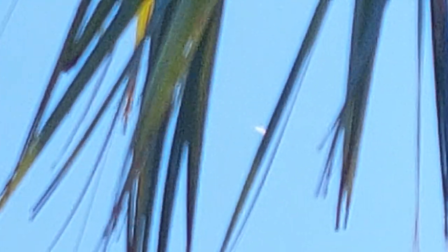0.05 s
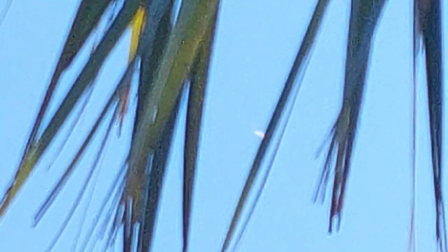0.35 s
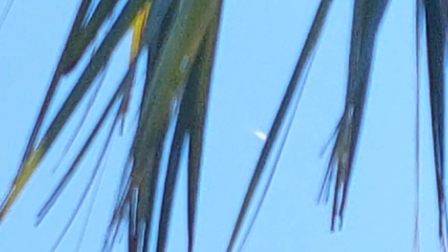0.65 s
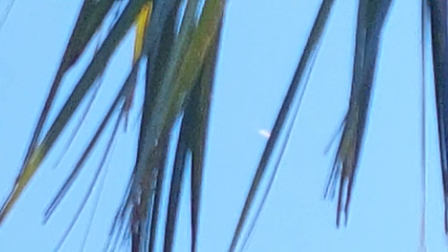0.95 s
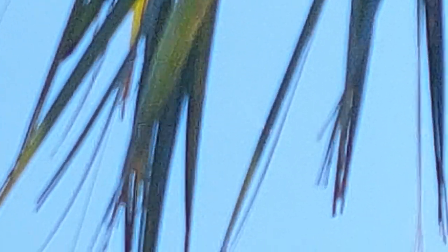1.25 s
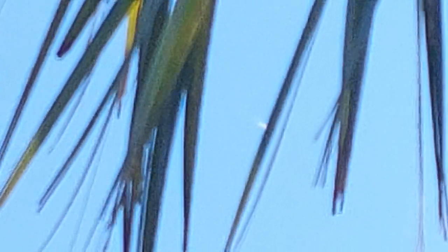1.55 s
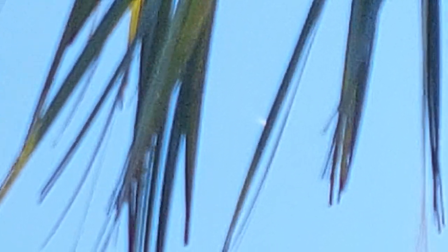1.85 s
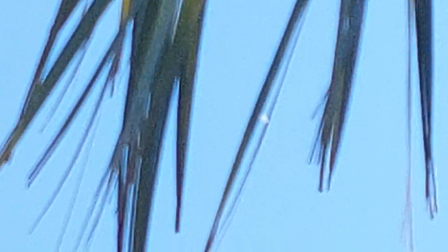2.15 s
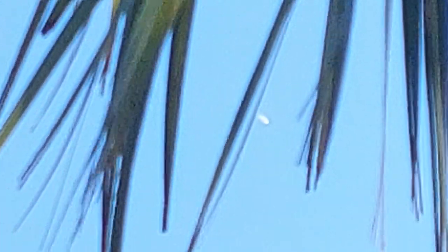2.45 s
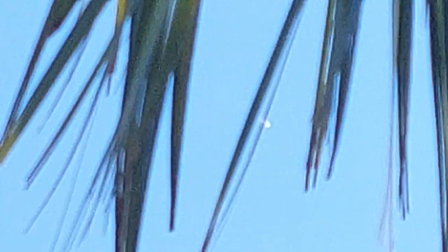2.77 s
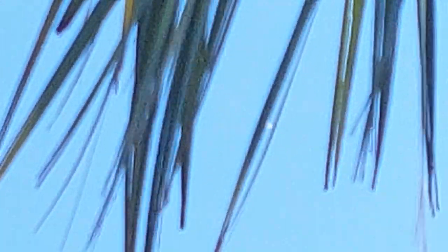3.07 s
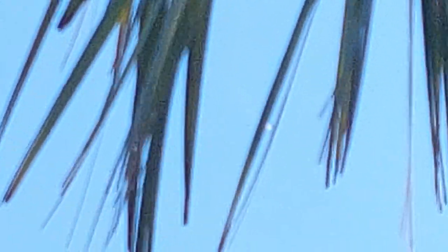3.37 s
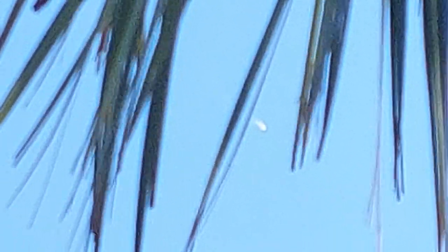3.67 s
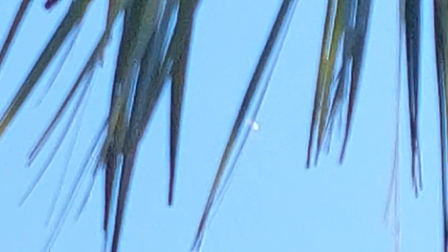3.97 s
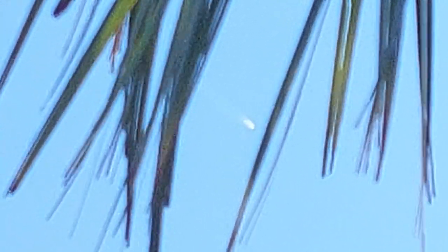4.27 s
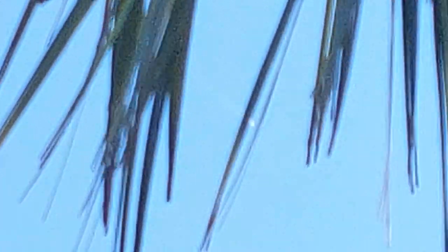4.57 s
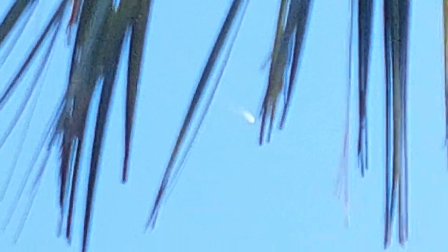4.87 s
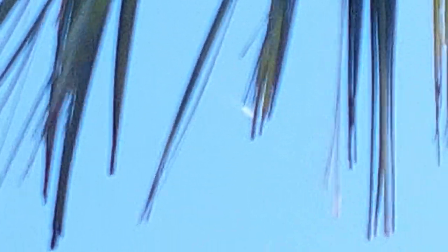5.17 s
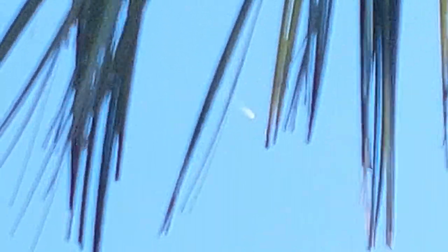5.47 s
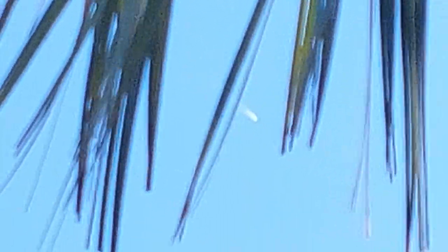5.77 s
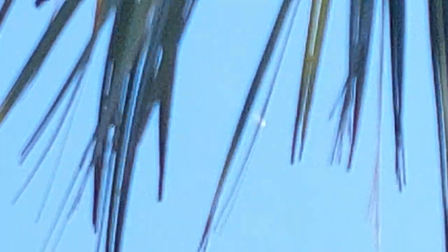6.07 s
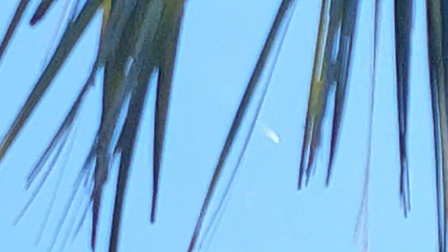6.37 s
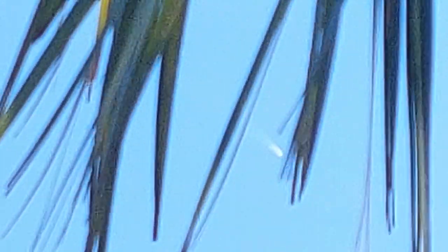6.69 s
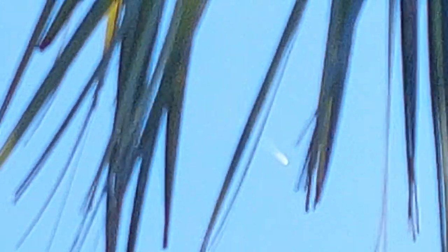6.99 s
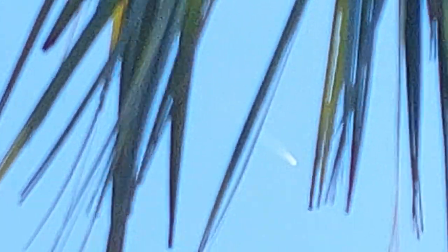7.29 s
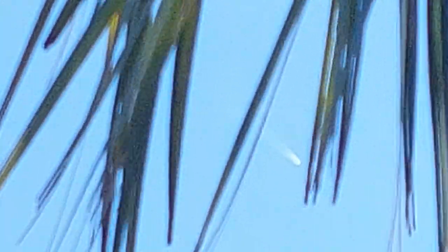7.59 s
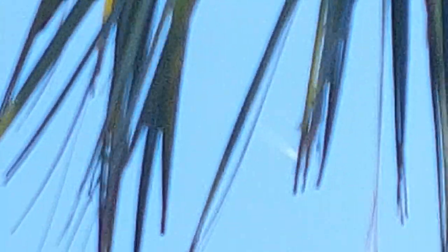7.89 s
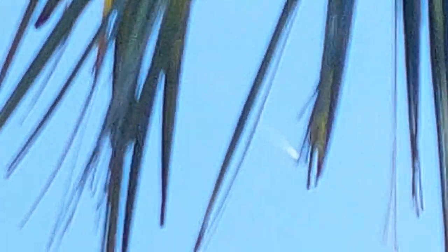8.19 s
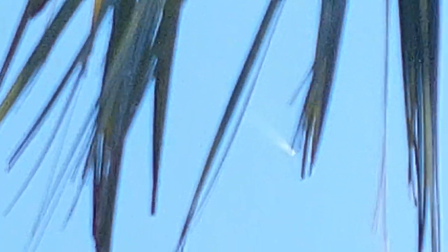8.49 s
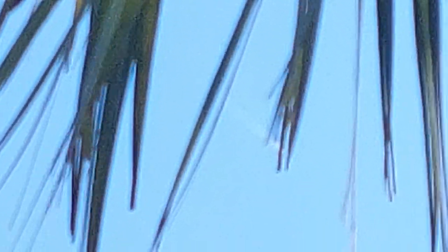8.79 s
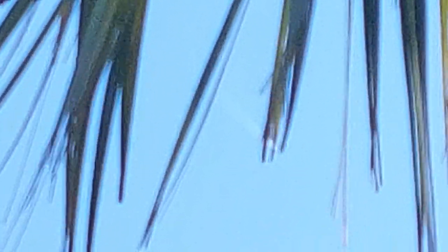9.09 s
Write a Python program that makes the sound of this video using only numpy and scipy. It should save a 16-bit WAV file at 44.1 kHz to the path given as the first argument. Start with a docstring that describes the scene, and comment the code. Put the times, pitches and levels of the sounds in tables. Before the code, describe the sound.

A far rocket rumbles outdoors as a throbbing helicopter approaches, passes and recedes, with palm leaves faintly hissing and crackling.

```python
"""From the start a far rocket's exhaust rumbles, a rotor, likely a helicopter's, beats as it approaches,
and a breeze hisses and swishes in a palm overhead. Near 3 s come a brief growl and the first frond crackle.
The rotor passes at 3.9 s: its drone, slap and rasp sink by the Doppler effect over a throbbing rush of air.
Around 5 s something loose, heard only now and then before, ticks in time with the blades. The wake swells
at 5.6 s, and from 6.7 s a faint, thin turbine whine comes and goes."""
import sys
import numpy as np
from scipy import signal
from scipy.fft import rfft, irfft, next_fast_len
from scipy.io import wavfile

SR = 44100
rng = np.random.default_rng(int(sys.argv[2]) if len(sys.argv) > 2 else 0)


def inscribe(sig):
    """Save sig as 16-bit PCM at rate SR to the path in sys.argv[1].

    A 1-D sig is mono; a 2-D sig holds one channel per row.
    Samples are clipped to [-1, 1] before scaling.
    """
    pcm = np.round(np.clip(np.atleast_2d(sig).T, -1, 1) * 32767)
    wavfile.write(sys.argv[1], SR, pcm.astype(np.int16))


N = 403074
T = np.arange(N) / SR


def amp(db):
    """The decibel scale: 20 dB is a factor of ten in amplitude."""
    return 10 ** (np.asarray(db) / 20)


def bell(x):
    """Gaussian curve, 1 at x = 0 and 1/e at x = 1."""
    return np.exp(-x ** 2)


def curves(rows):
    """Linear interpolation in time: each column after t as a value per sample."""
    times, *columns = np.transpose(rows)
    return [np.interp(T, times, column) for column in columns]


def spectrum_at(points, hz):
    """Interpolation of a spectrum on a log-frequency axis."""
    f, value = np.transpose(points)
    return np.interp(np.log(hz + 1), np.log(f + 1), value)


def drift(rate_hz, size=2048):
    """Low-pass noise: a random fluctuation of rms 1, up to about this rate."""
    f = np.fft.rfftfreq(size, N / SR / size)
    slow = irfft(rfft(rng.standard_normal(size)) * bell(f / rate_hz))
    return np.interp(T, np.linspace(0, N / SR, size), slow / np.sqrt(np.mean(slow ** 2)))


# Coherence of the two microphone ports: f/Hz, coherence
COHERENCE = [(60, .97), (130, .95), (290, .85), (600, .5), (1400, .5), (4000, .46), (15000, .46)]
# Left port relative to right: f/Hz, level/dB
BALANCE = [(60, -.4), (1200, 0), (2400, 3.5), (4400, 4.5), (8100, 6), (12000, 4), (15000, 3)]
def noise(spectrum, grain_db=0, lead_s=0, count=N, tint=lambda hz: 0):
    """Partially coherent noise at two ports, their mean at rms 1; random grain makes it crinkle."""
    size = next_fast_len(count, True)
    hz = np.fft.rfftfreq(size, 1 / SR)
    grains = amp(grain_db * np.minimum(rng.exponential(1, size), 6))
    left, independent = rfft(rng.standard_normal((2, size)) * grains)
    coherence = spectrum_at(COHERENCE, hz)
    delayed = np.exp(-2j * np.pi * hz * lead_s) * left
    right = coherence * delayed + np.sqrt(1 - coherence ** 2) * independent
    balance_db = np.array([[.5], [-.5]]) * spectrum_at(BALANCE, hz)
    colour = amp(spectrum_at(spectrum, hz) + tint(hz) + balance_db)
    ports = irfft(np.array([left, right]) * colour, size)[:, :count]
    return ports / np.sqrt(np.mean(ports.mean(0) ** 2))


# Exhaust envelopes: t/s, rumble level/dB, roar level/dB
ROCKET_LEVELS = [(0, -26, -40.5), (1.2, -26, -38), (1.7, -28.5, -39), (2.6, -31.5, -28.5),
                 (3.3, -39, -28.5), (5.8, -40, -30.5), (7.0, -33, -31), (7.8, -32, -28.5), (9.14, -32, -30)]
# Exhaust spectra: f/Hz, relative level/dB
RUMBLE_SPECTRUM = [(8, -47), (25, -18.5), (33, -3), (45, -1), (60, 9), (85, 3), (130, -5), (200, -14),
                   (330, -50), (800, -71.5), (2000, -140)]
ROAR_SPECTRUM = [(40, -31), (85, 6), (130, 2.5), (170, -8.5), (250, -4.5), (310, -12.5), (400, -16.5),
                 (500, -29), (900, -46.5), (2500, -120)]
def rocket(rumble_lift_db=2, lumps_db=1.5):
    """Jet noise, its treble lost to air absorption: a lumpy rumble under a smoother roar."""
    rumble_db, roar_db = curves(ROCKET_LEVELS)
    rumble = noise(RUMBLE_SPECTRUM) * amp(rumble_db + rumble_lift_db + lumps_db * drift(8.8))
    return rumble + noise(ROAR_SPECTRUM) * amp(roar_db)


BLADE_HZ, SPEED_M_PER_S, SOUND_M_PER_S = 22.347, 23.8, 343
def flight(closest_m=27.6, closest_s=3.91):
    """Spherical spreading from a straight path: nearness (1 at most), heading (+ coming, - going)."""
    along_m = SPEED_M_PER_S * (closest_s - T)
    distance_m = np.hypot(along_m, closest_m)
    return closest_m / distance_m, along_m / distance_m


def blade_cycles(blade_pass_s=4.552):
    """Phase as the integral of the Doppler-shifted blade rate; whole numbers fall on blade passes."""
    _, heading = flight()
    heard_hz = BLADE_HZ / (1 - heading * SPEED_M_PER_S / SOUND_M_PER_S)
    cycles = np.cumsum(heard_hz) / SR
    return cycles - np.interp(blade_pass_s, T, cycles)


def harmonic(cycles, k, flutter, spread_rad, lag_cycles):
    """Scintillation: turbulence shakes harmonic k, and reflections set the ports apart in phase."""
    phase = 2 * np.pi * (k * cycles - lag_cycles) + flutter * (drift(4.7) + .5 * drift(21))
    apart = spread_rad * rng.choice([-1, 1])
    strength = np.sqrt(2) * np.exp(flutter * drift(3.8) - flutter ** 2)
    return strength * np.cos([phase + apart, phase - apart])


# Low blade harmonics: harmonic number, relative level/dB
DRONE_HARMONICS = [(2, -26.5), (3, -16.5), (4, -8), (5, -0.5), (6, -13), (7, -23)]
# Fading on the way through the air: t/s, gain/dB
DRONE_FADES = [(0, 6), (.7, 2), (1.45, 5), (2.4, 2), (3.13, 5), (3.3, 1), (3.46, 4), (3.62, 1.5),
               (3.85, 5.5), (4.1, -0.5), (4.24, 4), (4.4, 1), (4.75, 2.5), (5.55, 2.5), (5.68, -2.5),
               (6.17, 5), (6.31, 1.5), (6.45, 6), (6.63, -2), (6.76, 8), (7.5, 5), (7.9, -5), (9.14, -4)]
def drone(cycles, gain_db=-19, smear_cycles=.2):
    """Phase dispersion: reflections smear the low harmonics, so they hum more than they thump."""
    near, _ = flight()
    fading_db, = curves(DRONE_FADES)
    hum = sum(amp(db) * harmonic(cycles, k, flutter=.06, spread_rad=.14, lag_cycles=smear_cycles * k**2)
              for k, db in DRONE_HARMONICS)
    return near * hum * amp(gain_db + fading_db)


# Surges and lulls: t/s, half width/s, slap gain/dB, rush gain/dB, stressed f/Hz, stress/dB
ROUGH_AIR = [(1.2, 0.085, -0.5, 13, 265, 7), (1.88, .1, -0.5, 2.5, 277, -4),
             (2.149, 0.21, 4.5, 1, 304, -1.5), (2.55, 0.25, -3, -3, 262, 9), (2.861, 0.096, 1, 5, 390, 5.5),
             (2.96, 0.043, -6.5, 1, 290, 0), (3.08, 0.056, -4.5, 5, 298, 8),
             (3.22, 0.054, -5, -1.5, 308, -2), (3.68, 0.46, 0, 4, 357, 6),
             (4.04, 0.083, 2.5, 8.5, 397, 9.5), (4.199, 0.08, 2, -5, 182, 4.5),
             (4.31, 0.085, 0, 0, 304, -1.5), (4.661, 0.12, 2, -11, 313, -21),
             (5.17, 0.57, 3.5, -4, 311, 7.5), (5.6, 0.32, 1, 8, 407, 6), (5.9, 0.25, 3.5, -8, 303, 4.5)]
def surges():
    """Unsteady blade loading in rough air: a bell in time for each row, then the other columns."""
    centre_s, half_s, *columns = np.transpose(ROUGH_AIR)
    return bell((T - centre_s[:, None]) / half_s[:, None]), *columns


# Middle blade harmonics: harmonic number, relative level/dB
SLAP_HARMONICS = [(8, -4), (9, -12), (10, -6.5), (11, -11.5), (12, -5.5), (13, -12.5), (14, -12.5),
                  (15, -18), (16, -20), (17, -28.5), (18, -18), (19, -22.5), (20, -34)]
def slap(cycles, gain_db=-27, stress_width=.19, late_cycles=.46, scatter_cycles=.24):
    """Directivity: blade slap is thrown forward along the flight path and sharpens as it passes."""
    near, heading = flight()
    bells, lift_db, _, stressed_hz, stress_db = surges()
    edge_db = -4 - 4 * heading
    uneven = cycles - late_cycles + .005 * drift(4.7)
    pulses = np.zeros((2, N))
    for k, db in SLAP_HARMONICS:
        lag = .065 * (k - 11) ** 2 + scatter_cycles * rng.random()  # smeared by reflections
        edge_share = np.clip((k - 11) / 4, 0, 1)
        surge_db = (lift_db + stress_db * bell((k * BLADE_HZ / stressed_hz - 1) / stress_width)) @ bells
        tone = harmonic(uneven, k, flutter=.3, spread_rad=min(.002 * k ** 2, np.pi / 4), lag_cycles=lag)
        pulses += amp(db + edge_share * edge_db + surge_db) * tone
    beam_db = 3.5 * heading + (1 - near)
    rough_db = .6 * drift(46)  # no two blade passes are alike
    return near * pulses * amp(gain_db + beam_db + rough_db)


# High blade harmonics: harmonic number, relative level/dB
RASP_HARMONICS = [(21, 4), (22, -8), (23, -1.5), (24, -2.5), (25, -0.5), (26, -12), (27, -10.5), (29, -4),
                  (30, -7), (31, -4), (32, -8), (33, -5.5), (34, -8.5), (35, -1.5), (36, -4), (37, -14.5),
                  (39, -9.5), (40, -3), (41, -3.5), (42, -8), (45, -11.5), (48, -11)]
# Flares and lulls: t/s, half width/s, centre f/Hz, relative bandwidth, gain/dB
RASP_SWELLS = [(1.2, .35, 538, 0.044, 9.5), (1.7, 1, 462, 0.051, -6), (2.1, 0.23, 537, 0.073, 10.5),
               (2.101, 0.22, 905, 0.056, 8.5), (2.86, 0.078, 800, 0.17, 11), (3.7, .55, 551, .08, -14),
               (4.051, .15, 810, .22, 4), (4.2, .5, 847, .13, 2.5), (4.9, 0.3, 782, 0.34, -1.5),
               (5.6, 0.33, 730, 0.61, 5.5), (5.65, 0.43, 555, 0.062, 6.5), (5.55, 0.21, 884, 0.039, 3)]
def rasp(cycles, gain_db=-54, late_cycles=.1, scatter_cycles=.55, rough_db=2):
    """A sharp pulse edge is rich in high harmonics; they sink with the beat and flare up in turn."""
    near, _ = flight()
    centre_s, half_s, centre_hz, width, flare_db = np.transpose(RASP_SWELLS)
    bells = bell((T - centre_s[:, None]) / half_s[:, None])
    uneven = cycles - late_cycles + .003 * drift(25)
    buzz = np.zeros((2, N))
    for k, db in RASP_HARMONICS:
        lift_db = (flare_db * bell((k * BLADE_HZ / centre_hz - 1) / width)) @ bells
        lag = scatter_cycles * rng.random()
        buzz += amp(db + lift_db) * harmonic(uneven, k, flutter=.42, spread_rad=.54, lag_cycles=lag)
    return near * buzz * amp(gain_db + rough_db * drift(25))


# Air torn by the blades: f/Hz, relative level/dB
RUSH_SPECTRUM = [(150, -13), (350, 0.5), (480, -4), (620, -7.5), (780, -3), (950, -3.5), (1150, -8.5),
                 (1600, -14), (3000, -21), (6000, -57.5), (12000, -94)]
def rush(cycles, gain_db=-58, puff_depth=1.7, puff_cycles=.27):
    """Amplitude modulation: each blade pass adds a puff of noise, strongest with the rotor closest."""
    near, _ = flight()
    bells, _, lift_db, *_ = surges()
    puffs = 1 + puff_depth * near * np.exp(-(cycles % 1) / puff_cycles)
    return near * puffs * noise(RUSH_SPECTRUM, grain_db=1.5) * amp(gain_db + lift_db @ bells)


def reflected(direct, strength=.55, far_delay_s=.0031, near_delay_s=.0039):
    """Comb filtering: an echo off a nearby surface sweeps notches, deepest as the rotor goes past."""
    near, _ = flight()
    delay_s = far_delay_s + (near_delay_s - far_delay_s) * near
    echo = np.array([np.interp(T - delay_s, T, port) for port in direct])
    return direct - strength * near * echo


# Stirred air: f/Hz, relative level/dB
WAKE_SPECTRUM = [(150, -11), (350, -3.5), (480, -2.5), (620, -4), (780, -0.5), (950, -0.5), (1150, -5.5),
                 (1600, -12), (3000, -24), (6000, -58.5), (12000, -92.5)]
def wake(before_db=-54, growth_db=9, arrives_s=5.62, rise_s=.2, fade_db_per_s=.8):
    """Wake turbulence: a broad rush that grows once the helicopter has gone by, then slowly settles."""
    grown = (1 + np.tanh((T - arrives_s) / rise_s)) / 2
    settled_db = fade_db_per_s * np.maximum(T - arrives_s, 0)
    return noise(WAKE_SPECTRUM, grain_db=3.5) * amp(before_db + growth_db * grown - settled_db)


PALM_LEAD_S = .00051  # the palm's sound reaches the left port first
# Strength of the breeze: t/s, hiss level/dB
BREEZE_LEVELS = [(0, -54.5), (1.6, -52.5), (2.25, -46), (3.1, -50), (3.62, -45.5), (4.2, -56.5),
                 (4.75, -55.5), (5.55, -48), (6.3, -53.5), (6.95, -47), (7.9, -49.5), (9.14, -46.5)]
# Air in the leaves: f/Hz, relative level/dB
HISS_SPECTRUM = [(200, -39), (450, 5.5), (800, 5), (1300, 5), (2000, -2), (2700, -5.5), (3300, -10.5),
                 (4000, -13.5), (5200, -14), (6500, -31.5), (9000, -28), (15000, -56.5)]
FIZZ_SPECTRUM = [(1000, -30), (4000, -1), (7000, 7), (9500, -10), (11500, -1), (13500, -1.5), (16000, -8.5)]
def breeze(fizz_db=-22):
    """Flow noise: palm leaves hiss and fizz with the strength of the breeze, flickering slightly."""
    breeze_db, = curves(BREEZE_LEVELS)
    hiss = noise(HISS_SPECTRUM, grain_db=1.5, lead_s=PALM_LEAD_S) * amp(drift(23))
    fizz = noise(FIZZ_SPECTRUM, grain_db=3, lead_s=PALM_LEAD_S) * amp(fizz_db + 1.3 * drift(14))
    return (hiss + fizz) * amp(breeze_db)


# Steady background: f/Hz, relative level/dB
BACKGROUND_SPECTRUM = [(1500, -15), (3200, -4.5), (3850, 4), (4500, -1), (5800, -8.5), (6300, -7.5),
                       (8000, -13), (9800, -17.5), (11400, -14), (11900, -30), (16000, -29.5)]
def background(level_db=-64.5):
    """Stationary noise: a faint, even hiss."""
    return noise(BACKGROUND_SPECTRUM) * amp(level_db)


def tilt(hz, db_per_octave):
    """Spectral slope above 1500 Hz, as a gain in dB."""
    return db_per_octave * np.log2(np.maximum(hz, 1500))


# Rubbing fronds: f/Hz, relative level/dB
FROND_SPECTRUM = [(300, -25.5), (1000, -5), (2500, 15.5), (4000, 10.5), (5200, 9), (6500, 4.5), (8000, 4.5),
                  (10000, 1.5), (11800, 5.5), (13500, 1.5), (16000, -4)]
# Strokes: t/s, peak level/dB, rise/s, fall/s, tilt/(dB per octave), resonance f/Hz
FROND_STROKES = [(.14, -63, 0.016, 0.053, -1.5, 12900), (.29, -64, 0.03, 0.069, -2.5, 13600),
                 (.98, -62, 0.027, 0.034, 11, 8950), (2.35, -59, 0.067, 0.23, -5.5, 4800),
                 (2.91, -58, 0.068, 0.07, -0.5, 2620), (3.37, -55, 0.15, 0.06, -2, 2540),
                 (3.621, -57, .05, 0.043, 1.5, 2720), (4.021, -54.5, 0.092, 0.085, 0, 2950),
                 (4.36, -58.5, 0.096, 0.1, -1, 5070), (4.959, -55, 0.058, 0.091, -0.5, 2520),
                 (5.04, -55, 0.029, 0.048, -5, 5200), (5.46, -56.5, 0.1, 0.079, 1, 4840),
                 (5.619, -56.5, 0.046, 0.083, -0.5, 5100), (6.858, -53.5, 0.012, 0.11, 2.5, 5050),
                 (6.89, -60, .025, 0.048, -1, 10900), (6.92, -50.5, 0.066, 0.11, -26, 1300),
                 (7.35, -60, .15, 0.37, -6, 4960), (7.68, -74, 0.022, 0.035, 7, 11000),
                 (8.6, -52.5, 0.18, 0.32, -10, 5500), (9.0, -55, 0.11, 0.14, -10.5, 5600)]
def swishes(scrape_db=9, scrape_width=.13, jerks_db=2):
    """Sliding friction: fronds brush in small jerks, each swish with one scraping resonance."""
    out = np.zeros((2, N))
    for peak_s, db, rise_s, fall_s, slope, scrape_hz in FROND_STROKES:
        during = abs(T - peak_s) < .5
        t = T[during] - peak_s
        tint = lambda hz: tilt(hz, slope) + scrape_db * bell((hz / scrape_hz - 1) / scrape_width)
        swell = np.exp(-(t / np.where(t < 0, rise_s, fall_s)) ** 2 / 2)
        friction = noise(FROND_SPECTRUM, grain_db=3, lead_s=PALM_LEAD_S, count=len(t), tint=tint)
        out[:, during] += amp(db) * swell * friction
    return out * amp(jerks_db * drift(80))


# One tick: f/Hz, relative level/dB
TICK_SPECTRUM = [(1500, -23), (4000, 1.5), (7000, 3), (10000, 0), (12500, 6), (16000, -7)]
# Knocks, most on a blade pass or a rebound: t/s, level/dB, tilt/(dB per octave)
KNOCKS = [(.286, -55, 3), (0.44, -49, -5), (.4438, -46, -10), (1.704, -50, -4), (4.925, -55, 1),
          (4.972, -54, 1), (5.019, -51, 2), (5.066, -48, 12), (5.349, -54, 5), (5.397, -45, 7),
          (5.415, -52, 5), (5.444, -47, 4), (5.462, -48, 0), (5.491, -48, 0), (5.51, -51, -4),
          (5.538, -49, 5), (5.586, -44, 3), (5.632, -47, 1), (5.652, -47, 0), (5.68, -48, -5),
          (5.699, -49, -7), (5.727, -55, -2), (7.681, -50, 3)]
def ticks(gain_db=-3, decay_s=.0032, rise_s=.0005):
    """Damped impacts: something loose, knocked by the blade pulses, gives tiny bursts of treble."""
    out = np.zeros((2, N))
    for start_s, db, slope in KNOCKS:
        during = (T >= start_s) & (T < start_s + 10 * decay_s)
        t = T[during] - start_s
        envelope = np.minimum(t / rise_s, 1) * np.exp(-t / decay_s)
        burst = noise(TICK_SPECTRUM, lead_s=PALM_LEAD_S, count=2048, tint=lambda hz: tilt(hz, slope))
        out[:, during] += amp(db + gain_db) * envelope * burst[:, :len(t)]
    return out


# Mid-range swells: t/s, peak level/dB, half width/s, centre f/Hz, width/octaves
GROWL_SWELLS = [(2.8, -51, 0.052, 557, 0.65), (5.56, -48, 0.11, 740, 0.56), (6.9, -46.5, 0.07, 675, 1.6),
                (9.12, -44.5, 0.18, 1020, 0.7)]
def growls(skirt_db=11):
    """Band-pass noise: brief, rough swells of roar, filtered skirt_db down one width from the centre."""
    out = np.zeros((2, N))
    for peak_s, db, half_s, centre_hz, octaves in GROWL_SWELLS:
        during = abs(T - peak_s) < .5
        t = T[during] - peak_s
        band = lambda hz: -skirt_db * abs(np.log2((hz + 1) / centre_hz)) / octaves
        swell = np.exp(-(t / half_s) ** 2 / 2)
        out[:, during] += amp(db) * swell * noise(WAKE_SPECTRUM, grain_db=5, count=len(t), tint=band)
    return out * amp(drift(30))


# Papery snaps: t/s, peak level/dB, f/Hz
LEAF_SNAPS = [(2.911, -58, 4600), (4.399, -59, 5200), (5.03, -54, 5160), (5.385, -54, 4900),
              (5.428, -57, 5000), (5.476, -49, 4600), (5.604, -52, 6000), (6.743, -56, 4900),
              (6.863, -52, 4900), (6.977, -56, 5000)]
def crackles(rise_s=.0015, skirt_db_per_octave=30):
    """Stick-slip: dry leaf edges catch and let go, each in a few milliseconds of pitched noise."""
    out = np.zeros((2, N))
    for start_s, db, pitch_hz in LEAF_SNAPS:
        during = (T >= start_s) & (T < start_s + 10 * rise_s)
        age = (T[during] - start_s) / rise_s
        band = lambda hz: -skirt_db_per_octave * abs(np.log2((hz + 1) / pitch_hz))
        snap = noise(FROND_SPECTRUM, lead_s=PALM_LEAD_S, count=4096, tint=band)
        out[:, during] += amp(db) * age * np.exp(1 - age) * snap[:, :len(age)]
    return out


# Stretches of whine: t/s, length/s, first f/Hz, target f/Hz, first level/dB, last level/dB
WHINE_GLIDES = [(6.67, 0.11, 8600, 8900, -74, -75), (7.104, 0.96, 8750, 8400, -77, -82),
                (8.237, 0.91, 8560, 7500, -80, -69)]
def whine(waver_hz=50, settle_share=.48, fade_s=.027, flicker_db=2):
    """Random frequency modulation blurs a thin turbine tone; each stretch glides toward a new pitch."""
    hz, level = np.zeros(N), np.zeros(N)
    for start_s, length_s, first_hz, target_hz, first_db, last_db in WHINE_GLIDES:
        during = (T >= start_s) & (T < start_s + length_s)
        t = T[during] - start_s
        hz[during] = target_hz + (first_hz - target_hz) * np.exp(-t / (settle_share * length_s))
        fade = np.minimum(np.minimum(t, length_s - t) / fade_s, 1)
        level[during] = amp(first_db + (last_db - first_db) * t / length_s) * fade
    level *= np.sqrt(2) * amp(flicker_db * drift(13))
    phases = [2 * np.pi * np.cumsum(hz + waver_hz * drift(60)) / SR for _ in range(2)]
    return level * np.sin(phases)


def scene():
    """Superposition: rocket, helicopter and palm add at the two ports."""
    cycles = blade_cycles()
    helicopter = drone(cycles) + slap(cycles) + rasp(cycles) + reflected(rush(cycles)) + wake() + whine()
    return rocket() + helicopter + growls() + breeze() + background() + swishes() + crackles() + ticks()


def record(dry, cutoff_hz=15850):
    """Band limiting: a steep low-pass filter removes the highest treble."""
    taps = signal.firwin(511, cutoff_hz, window=("kaiser", 9), fs=SR)
    return signal.oaconvolve(dry, taps[None], "same", axes=1)


dry = scene()
out = record(dry)
inscribe(out)
```